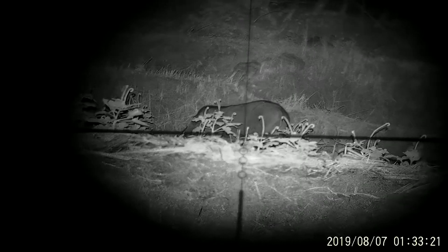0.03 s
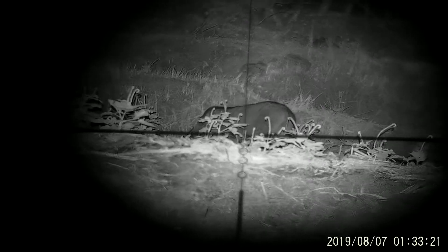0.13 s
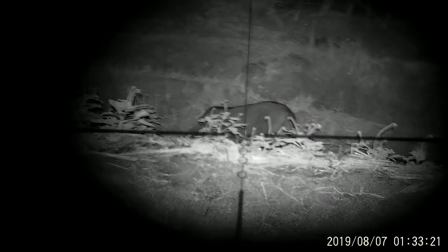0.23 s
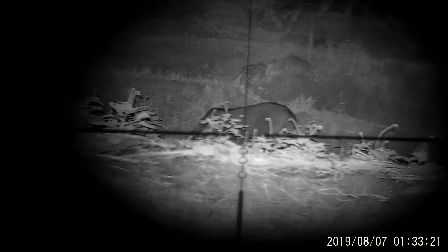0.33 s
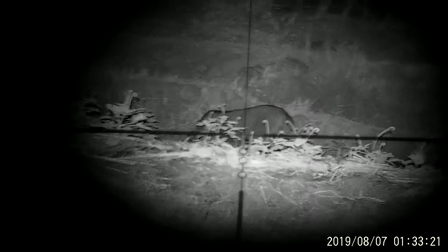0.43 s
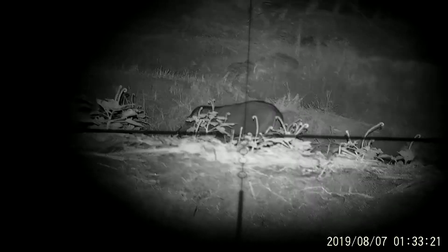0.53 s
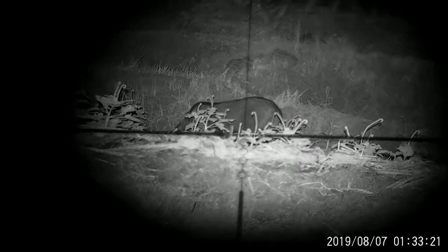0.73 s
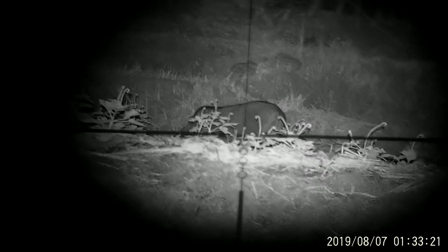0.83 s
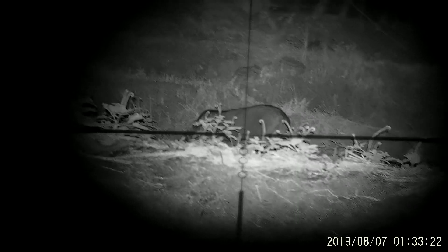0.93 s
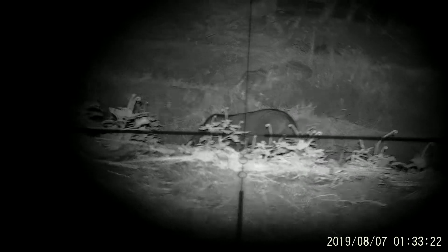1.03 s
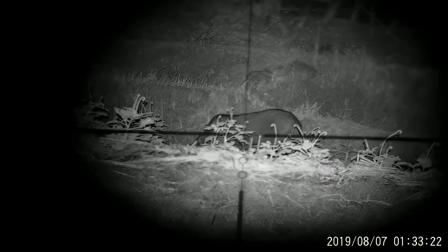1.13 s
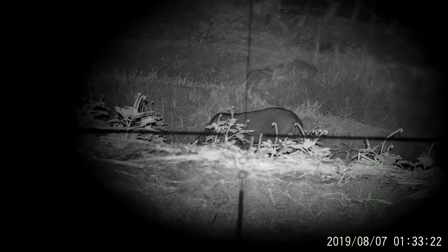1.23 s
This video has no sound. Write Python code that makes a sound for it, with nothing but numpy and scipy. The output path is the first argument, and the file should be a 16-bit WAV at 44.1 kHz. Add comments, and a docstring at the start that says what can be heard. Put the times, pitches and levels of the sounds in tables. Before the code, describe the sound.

Outdoors at night, a stiff catch on a rifle scope snaps over with one loud click, picked up by the scope's own microphone. A slight metallic ring and two soft knocks follow, leaving only faint hiss and a thin whine.

```python
"""Faint hiss, low night air and a thin electronic whine lie under a rifle scope's own microphone.
At 0.21 s a stiff catch on the scope slides by stick-slip friction and snaps over: the impact briefly
excites the damped modes of the housing, leaves thin metal parts singing and opens a noise gate.
At 0.35 s and 0.37 s the catch settles with two small knocks. Afterwards the hiss swells faintly twice
and the low air grows louder."""
import sys
import numpy as np
from scipy import signal
from scipy.fft import rfft, irfft
from scipy.io import wavfile
from scipy.ndimage import uniform_filter1d

SR = 44100
rng = np.random.default_rng(int(sys.argv[2]) if len(sys.argv) > 2 else 0)


def put_to_file(sound):
    """Save the sound as 16-bit audio at rate SR, in the file named by the first command-line argument."""
    columns = np.atleast_2d(sound).T  # one column per channel
    safe = np.clip(columns, -1, 1)
    whole_steps = np.round(safe * 32767)
    wavfile.write(sys.argv[1], SR, whole_steps.astype(np.int16))


N = 57330
T = np.arange(N) / SR
RING_T = T[:SR // 2]


def amp(db):
    """Amplitude ratio of a level in decibels."""
    return 10 ** (np.asarray(db) / 20)


def noise(spectrum):
    """Spectral shaping: white noise weighted by a spectrum, at unit rms."""
    hz, db = np.transpose(spectrum)
    gain = amp(np.interp(np.log(np.fft.rfftfreq(N, 1 / SR) + 1), np.log(hz), db))
    shaped = irfft(rfft(rng.standard_normal(N)) * gain, N)
    return shaped / np.sqrt(np.mean(shaped ** 2) + 1e-20)


def cut(x, hz, kind, order):
    """Causal low-pass or high-pass filtering."""
    return signal.sosfilt(signal.butter(order, min(hz, .45 * SR), kind, fs=SR, output="sos"), x)


# spectrum of the steady hiss (frequency [Hz], relative density [dB])
HISS_SPECTRUM = [(25, -3), (130, -8), (240, -9.5), (360, -9), (740, -15), (1500, -19.5), (3600, -28),
                 (5000, -30), (8000, -31), (12500, -33), (13600, -28.5), (14300, -29), (15700, -43.5)]
def hiss():
    """Stationary broadband noise: a constant floor."""
    return amp(-55.5) * noise(HISS_SPECTRUM)


# spectrum of the night air (frequency [Hz], relative density [dB])
AIR_SPECTRUM = [(10, -4.5), (50, 0.5), (130, -5.5), (220, -16.5), (500, -49), (2000, -79)]
# envelope of its rumble (time [s], level [dB])
AIR_ENVELOPE = [(0, -73.5), (.5, -66), (.8, -66), (.95, -53.5), (1.03, -61), (1.11, -53), (1.3, -60.5)]
def night_air():
    """Amplitude modulation: low-frequency noise rises and falls unevenly."""
    return noise(AIR_SPECTRUM) * amp(np.interp(T, *np.transpose(AIR_ENVELOPE)))


# first three harmonics of the whine (level [dB])
WHINE_HARMONICS = [-65.5, -68, -71.5]
def whine(fundamental_hz=4032):
    """Harmonic series: the electronics sound at whole multiples of one frequency."""
    return sum(amp(db) * np.sin(2 * np.pi * (k * fundamental_hz * T + rng.random()))
               for k, db in enumerate(WHINE_HARMONICS, 1))


def ring(modes, low_hz, high_hz, rise_cycles=0.26):
    """Modal superposition: damped sines, each weighted by the force spectrum of the contact."""
    out, t = np.zeros(len(RING_T)), RING_T
    for hz, db, t60 in modes:
        force = ((1 + (low_hz / hz) ** 4) * (1 + (hz / high_hz) ** 4)) ** -.5
        rise = -np.expm1(-t * hz / rise_cycles)
        out += force * amp(db - 60 * t / t60) * rise * np.sin(2 * np.pi * hz * t)
    return out


# modes of the housing (frequency [Hz], relative level [dB], decay time T60 [s])
HOUSING_MODES = [(112.4, -29.5, .04), (307.9, -12.5, 0.04), (509.7, -10, 0.034), (884.7, -17, 0.031),
                 (1294.5, -12.5, 0.047), (1470, -8.5, 0.011), (2269, -8, 0.01615), (2793, -10, .013),
                 (3680, -12.5, 0.014), (4667, -19.5, .017), (5050, -17.5, 0.016), (6117, -15, .016),
                 (6734, -23.5, .014), (8272, -20.5, .018)]
def housing(low_hz, high_hz):
    """Heavy damping: the struck housing rings only briefly."""
    return ring(HOUSING_MODES, low_hz, high_hz)


def slide(start_s=.2065, rise_s=0.001, slips_per_s=2500):
    """Stick-slip friction: tiny random slips excite the housing until the catch lets go."""
    snap_s = CATCH_IMPACTS[0][0]
    slips = rng.choice([-1, 1], N) * (rng.random(N) < slips_per_s / SR)
    pressure = np.clip((T - start_s) / rise_s, 0, 1) * (T < snap_s)
    scrape = signal.fftconvolve(slips * pressure, housing(low_hz=710, high_hz=6983))[:N]
    peak_rms = np.sqrt(uniform_filter1d(scrape ** 2, size=256).max() + 1e-20)
    return amp(-31) * scrape / peak_rms


# modes of the thin metal parts (frequency [Hz], relative level [dB], decay time T60 [s])
METAL_MODES = [(379.4, -24.5, 0.12), (577.5, -24, .13), (800, -26.5, 0.46), (1097, -46, .3),
               (1289.6, -34, 0.35), (1330, -33, .13), (2406, -45, .13), (3850, -55, 0.16),
               (4840, -53, 0.33), (5016, -45, 0.1106), (5326, -53.5, 0.29), (6270, -52, 0.16)]
def metal(low_hz, high_hz):
    """Light damping: the thin metal parts sing on after a blow."""
    return ring(METAL_MODES, low_hz, high_hz)


# contacts of the snap and the knocks
# (time [s], gain [dB], lower band edge [Hz], upper band edge [Hz], relative metal gain [dB])
CATCH_IMPACTS = [(0.2171, -16.5, 5030, 8000, -20), (.2172, 3, 1060, 5970, -2), (.2192, -2, 158, 830, 2.5),
                 (.3512, -34, 2485, 7000, -11.5), (.3525, -27, 480, 2420, -13),
                 (0.3588, -22, 900, 1280, -24), (0.3705, -28, 1090, 5600, -16),
                 (.3722, -14.5, 330, 660, -41)]
def impacts(crack_t60_s=0.02, rattle_t60_s=0.17):
    """Impact excitation: light contacts drive the high modes, heavy soft ones the low modes."""
    out, t = np.zeros(N), RING_T
    for start_s, db, low_hz, high_hz, metal_db in CATCH_IMPACTS:
        grit = cut(rng.standard_normal(len(t)), low_hz, "high", order=2)
        grit = cut(grit, high_hz, "low", order=2)
        crack = amp(-10.5 - 60 * t / crack_t60_s) * grit  # dense, unresolved modes
        modes = housing(low_hz, high_hz) + amp(metal_db) * metal(low_hz, high_hz)
        impact = modes + crack + rattle(rattle_t60_s)
        out += amp(db) * np.pad(impact, (round(start_s * SR), N))[:N]
    return out


# spectrum of the rattle (frequency [Hz], relative density [dB])
RATTLE_SPECTRUM = [(100, -22), (270, 3), (700, -3.5), (1400, -10), (2200, -25.5), (6500, -37),
                   (9000, -34.5), (16000, -45)]
def rattle(t60_s):
    """Exponential decay: a faint tail of noise follows a contact."""
    return amp(-37 - 60 * RING_T / t60_s) * noise(RATTLE_SPECTRUM)[:len(RING_T)]


def band_limit(click):
    """Band-pass filtering: the click loses its deep bass and highest treble."""
    return cut(cut(click, 210, "high", order=3), 7090, "low", order=10)


# spectrum of the swells (frequency [Hz], relative density [dB])
SWELL_SPECTRUM = [(100, -21.5), (2000, -11), (5500, -4), (8000, -12), (15000, -9)]
# swells of the hiss (time [s], 1/e half-width [s], peak level [dB])
HISS_SWELLS = [(0.506, 0.046, -66), (.98, 0.033, -64)]
def hiss_swells():
    """Amplitude modulation: bright noise rises and falls under two bell-shaped envelopes."""
    envelope = sum(amp(db) * np.exp(-((T - peak_s) / half_s) ** 2) for peak_s, half_s, db in HISS_SWELLS)
    return noise(SWELL_SPECTRUM) * envelope


def scene():
    """Superposition: the catch and the quiet background add in one channel."""
    catch = band_limit(impacts() + slide())
    background = hiss_swells() + night_air() + whine() + hiss()
    return (catch + background)[None]


def record(dry):
    """Gating, clipping, band limiting: a shallow gate opens and slowly closes; the peak overloads."""
    threshold_db, depth_db, close_db_per_s = -46, 6, 30.5
    ceiling, edge_hz = 0.88, 15750
    power_db = 10 * np.log10(abs(uniform_filter1d(dry[0] ** 2, size=200)) + 1e-12)
    excess_db = np.clip(power_db - threshold_db, 0, depth_db)
    fall_db = close_db_per_s * T
    opened_db = np.maximum.accumulate(excess_db + fall_db) - fall_db  # decaying peak hold
    clipped = np.clip(dry * amp(opened_db - depth_db), -ceiling, ceiling)
    low_pass = signal.firwin(511, edge_hz, window=("kaiser", 9), fs=SR)
    return signal.oaconvolve(clipped, low_pass[None], "same")


dry = scene()
out = record(dry)
put_to_file(out)
```